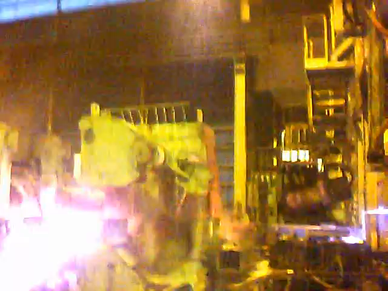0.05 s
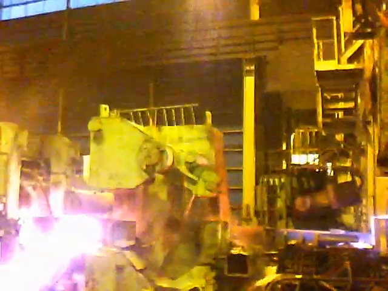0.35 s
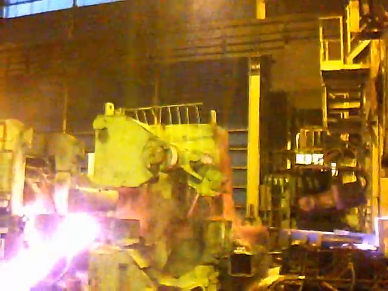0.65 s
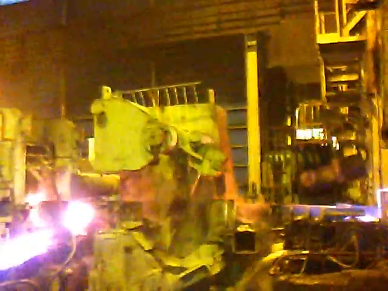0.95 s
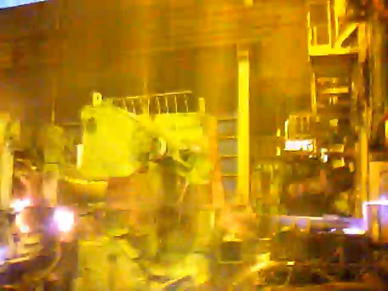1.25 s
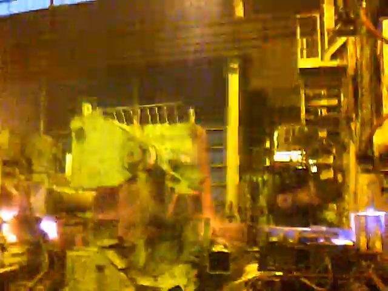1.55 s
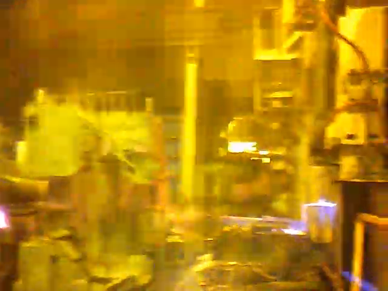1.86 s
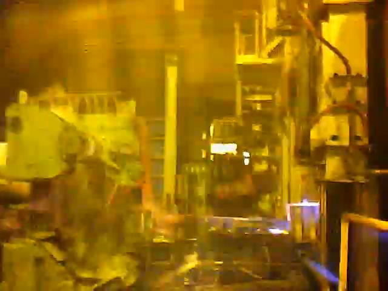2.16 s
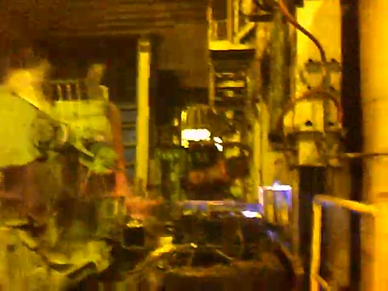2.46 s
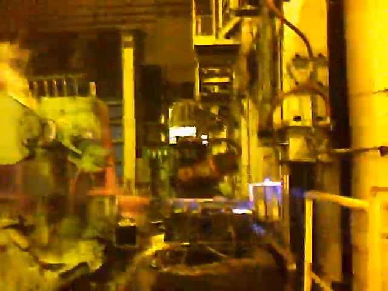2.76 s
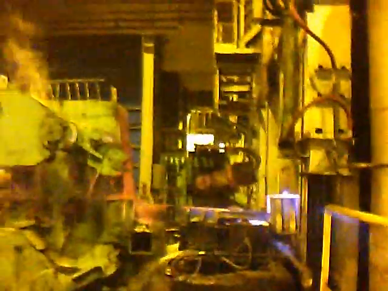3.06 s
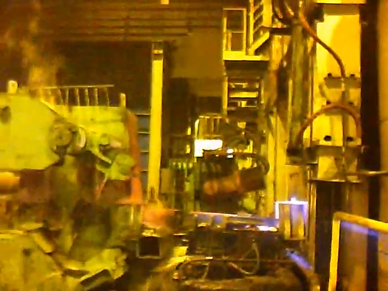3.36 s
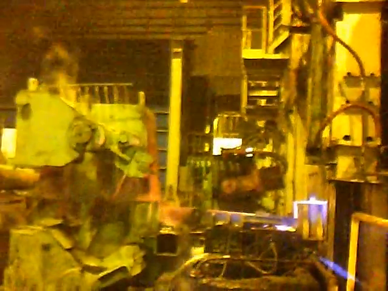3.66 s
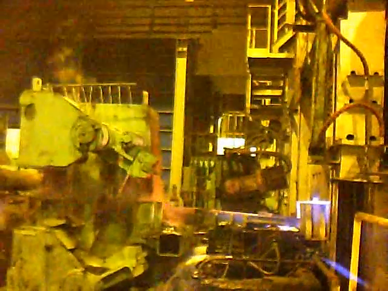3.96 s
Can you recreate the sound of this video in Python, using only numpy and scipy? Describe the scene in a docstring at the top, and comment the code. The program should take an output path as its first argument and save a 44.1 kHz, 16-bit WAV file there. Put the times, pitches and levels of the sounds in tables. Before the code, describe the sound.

Harsh, crackling furnace roar in a factory hall, over the hum and whine of machinery.

```python
"""A harsh, crackling roar fills a steel mill's hall: the turbulent flame of a furnace.
Motors and blowers hum and whine through it, swelling and fading as the microphone moves slowly,
while two drives at nearly equal speed beat against each other. The din overloads a small recorder,
whose input flattens it almost to a square wave; that distortion makes the crackling top."""
import sys
import numpy as np
from scipy import signal
from scipy.fft import rfft, irfft
from scipy.io import wavfile

SR = 44100
rng = np.random.default_rng(int(sys.argv[2]) if len(sys.argv) > 2 else 0)


def store_wav(level_fs):
    """Save 16-bit WAV to argv[1]."""
    pcm = np.round(np.clip(np.atleast_2d(level_fs), -1, 1) * 32767)
    wavfile.write(sys.argv[1], SR, pcm.T.astype(np.int16))


N = 176400

ROAR_DB, RUMBLE_TOP_HZ = 0.5, 590
FLUTTER_DB, FLUTTER_PER_S = 1.0, 7.0
MOTOR_HZ, BLOWER_HZ, WHINE_HZ = 326.17, 473.2, 1062
IN_PHASE_S = 0.38   # a maximum of the drives' beat
SPEED_WANDER, WANDER_PER_S = 0.000792, 2.054   # rms fraction of shaft speed; rate of its drift
FADING_DB, FADING_PER_S = 3.0, 1.2
START_S, COUPLING_HZ, CUTOFF_HZ = 0.1052, 3.0, 5450
DRIVE_DB, CEILING_DB, FAINT_NOISE_DB = 18, -21.5, -43.5


def from_db(db):
    """Amplitude ratio of a level: tenfold for every 20 dB."""
    return 10 ** (np.asarray(db) / 20)


def rms_one(x):
    """Normalisation to unit rms amplitude."""
    return x / np.sqrt(np.mean(x ** 2) + 1e-20)


def in_time(rows):
    """Linear interpolation of (time [s], value) rows at every sample."""
    return np.interp(np.arange(N) / SR, *np.transpose(rows))


def drift(rate):
    """Slow fluctuation of unit rms: noise through a two-pole low-pass with its poles at rate [Hz]."""
    hop, settling = 40, 2000   # samples per step; steps for the filter to settle
    pole = np.exp(-2 * np.pi * rate * hop / SR)
    noise = rng.standard_normal(N // hop + settling + 2)
    slow = signal.lfilter([1], [1, -2 * pole, pole * pole], noise)[settling:]
    return np.interp(np.arange(N) / hop, np.arange(len(slow)), rms_one(slow))


def coloured(x, spectrum):
    """Zero-phase filtering by (frequency [Hz], gain [dB]) points joined on a log-frequency axis."""
    hz, db = np.transpose(spectrum)
    bin_hz = np.maximum(np.fft.rfftfreq(2 * N, 1 / SR), 1)
    gain = from_db(np.interp(np.log(bin_hz), np.log(hz), db))
    return irfft(rfft(x, 2 * N) * gain)[:N]


def shaft_time():
    """Running time [s] of a shaft: the integral of its slightly wandering relative speed."""
    return np.cumsum(1 + SPEED_WANDER * drift(WANDER_PER_S)) / SR


def tone(hz, db, shaft_s):
    """A sinusoid of rms level db, phase-locked to a shaft's rotation."""
    return np.sqrt(2) * from_db(db) * np.sin(2 * np.pi * hz * shaft_s)


def furnace():
    """Turbulent combustion radiates broadband noise; its low rumble and upper rush flutter separately."""
    # spectrum of the roar in the hall: (frequency [Hz], relative spectral density [dB])
    roar_spectrum = [(30, -50), (50, -27), (85, -13.5), (124, -9.5), (141, -0.5), (150, -4), (161, 0.5),
                     (182, -6), (200, -2), (238, -1.5), (262, -8), (300, 1), (345, -3), (425, -5.5),
                     (450, -9.5), (495, -7.5), (600, -10), (720, -12.5), (890, -11), (1300, -16.5),
                     (1800, -23.5), (2600, -23), (3500, -23), (5000, -31.5), (7000, -43)]
    # slow swell of the rush: (time [s], level [dB])
    rush_levels = [(0.1, 0.5), (0.5, 2), (1.1, 0.5), (1.8, 0.5), (2.5, -1.4), (3.2, 0.5), (4.0, 0.0)]
    roar = rms_one(coloured(rng.standard_normal(N), roar_spectrum))
    rumble = signal.sosfiltfilt(signal.butter(2, RUMBLE_TOP_HZ, fs=SR, output="sos"), roar)
    rush = (roar - rumble) * from_db(in_time(rush_levels))
    return sum(band * from_db(ROAR_DB + FLUTTER_DB * drift(FLUTTER_PER_S)) for band in (rumble, rush))


def near_machines():
    """Steady rotation radiates tones, whose levels vary with the position of the moving microphone."""
    # hum of the main motor: (time [s], level [dB])
    motor_levels = [(0.1, -9), (0.55, -14), (0.8, -6.5), (1.9, -7.5), (2.15, -9.5), (2.65, -3.5),
                    (3.6, -1.5), (4.0, -3)]
    # tone of the blower: (time [s], level [dB])
    blower_levels = [(0.1, -14.5), (0.6, -10.5), (1.3, -14.5), (1.9, -12), (2.7, -19.5), (3.5, -21),
                     (4.0, -18.5)]
    # whine of the gears: (time [s], level [dB])
    whine_levels = [(0.099, -19.5), (0.5, -10.5), (1.05, -18.5), (1.6, -22.5), (1.85, -14), (2.6, -12),
                    (2.899, -18.5), (3.3, -14.5), (4.0, -14)]
    motor = tone(MOTOR_HZ, in_time(motor_levels), shaft_time())
    blower = tone(BLOWER_HZ, in_time(blower_levels), shaft_time())
    gears = tone(WHINE_HZ, in_time(whine_levels), shaft_time())
    return motor + blower + gears


def twin_drives():
    """Interference: the tones of two drives on one supply beat at their difference frequency."""
    # one tone per drive: (frequency [Hz], level [dB])
    drive_tones = [(420.8, -17.5), (422.3, -15.5)]
    shaft_s = shaft_time() - IN_PHASE_S
    return sum(tone(hz, db, shaft_s) for hz, db in drive_tones)


def far_machines():
    """Fading: faint tones cross the hall with slow, random amplitude modulation."""
    # one tone per distant machine: (frequency [Hz], mean level [dB])
    far_tones = [(373.0, -19.5), (397.0, -16.5), (600.0, -23), (793.0, -29), (1189.0, -27)]
    return sum(tone(hz, db + FADING_DB * drift(FADING_PER_S), shaft_time()) for hz, db in far_tones)


def scene():
    """Superposition: the pressures of furnace and machines add at one microphone."""
    return (furnace() + near_machines() + twin_drives() + far_machines())[None, :]


def record(dry):
    """Saturation clips the input and filters limit the band. A faint noise also sounds, lying on the flattened
    peaks."""
    # treble response of the recorder: (frequency [Hz], gain [dB])
    treble_response = [(2000, 0), (3000, -0.5), (3500, -3), (4000, -5), (4400, -11.5), (4800, -19.5),
                       (5100, -29), (5400, -46.5)]
    clipped = from_db(CEILING_DB) * np.tanh(from_db(DRIVE_DB) * dry[0])
    faint_noise = from_db(FAINT_NOISE_DB) * rng.standard_normal(N)
    switched_on = np.arange(N) / SR >= START_S
    ac_coupling = signal.butter(1, COUPLING_HZ, "high", fs=SR, output="sos")
    coupled = signal.sosfilt(ac_coupling, (clipped + faint_noise) * switched_on)
    steep_lowpass = signal.firwin(601, CUTOFF_HZ, window=("kaiser", 9), fs=SR)
    return signal.fftconvolve(coloured(coupled, treble_response), steep_lowpass, "same")[None, :]


dry = scene()
out = record(dry)
store_wav(out)
```